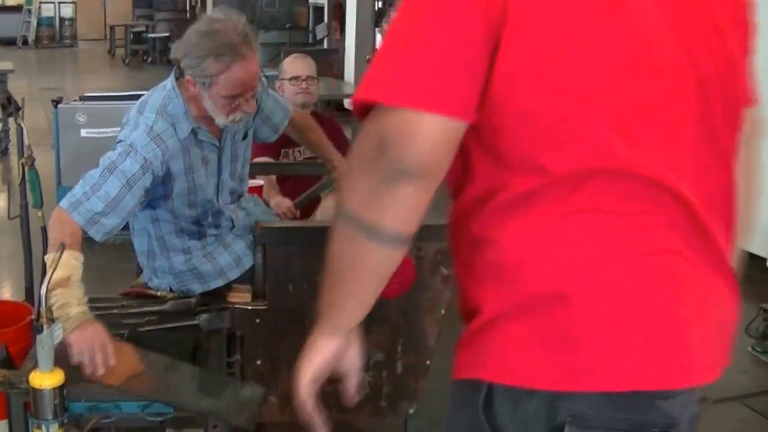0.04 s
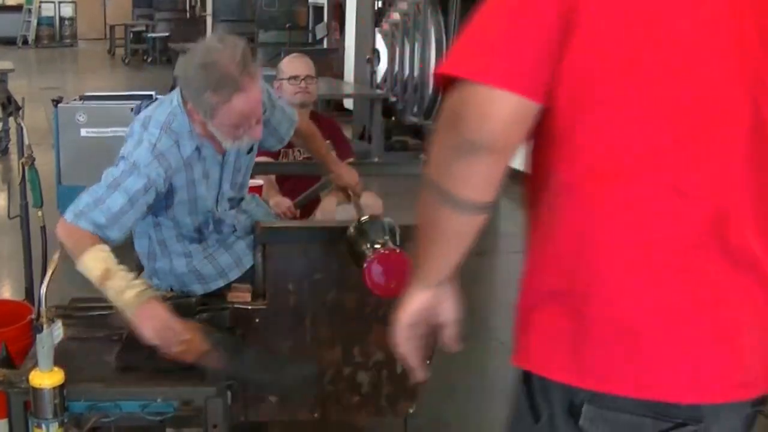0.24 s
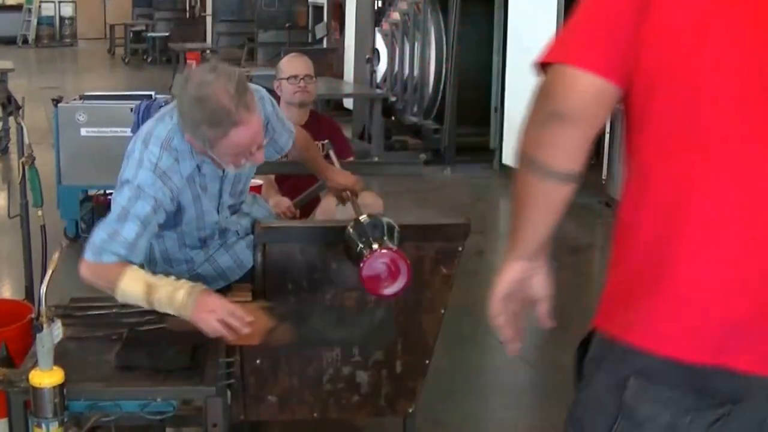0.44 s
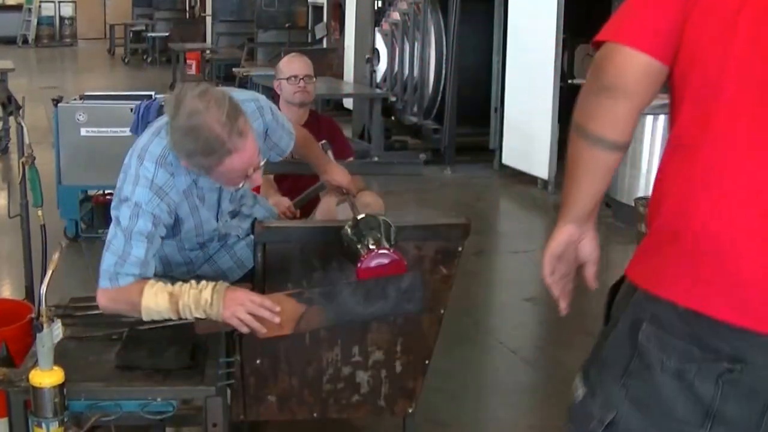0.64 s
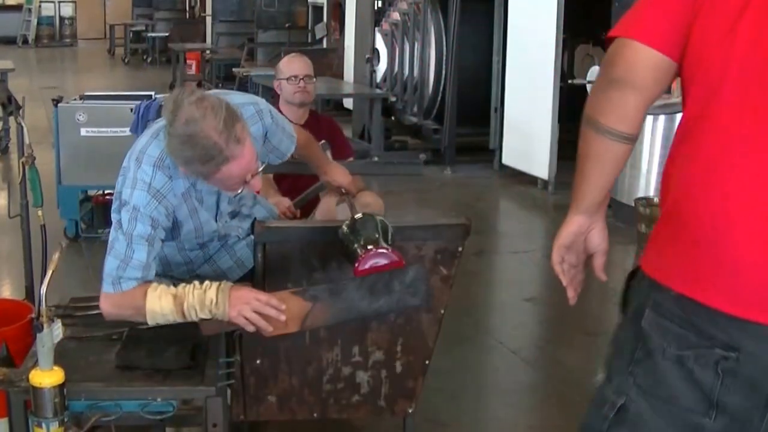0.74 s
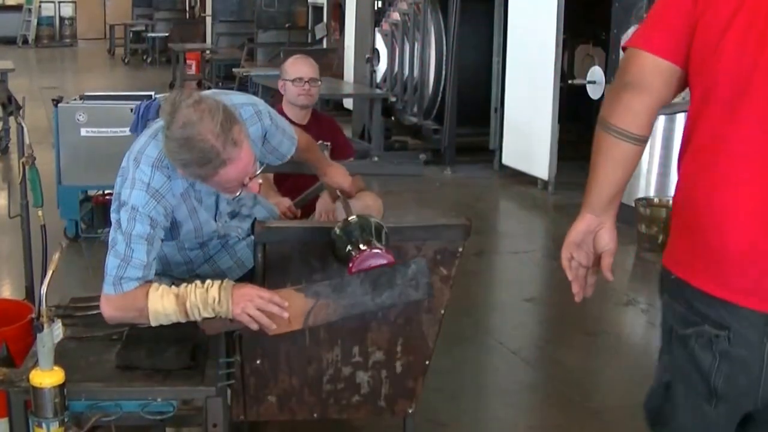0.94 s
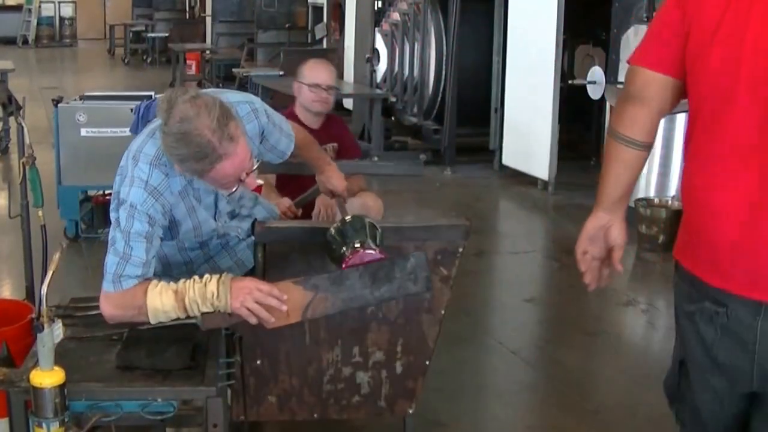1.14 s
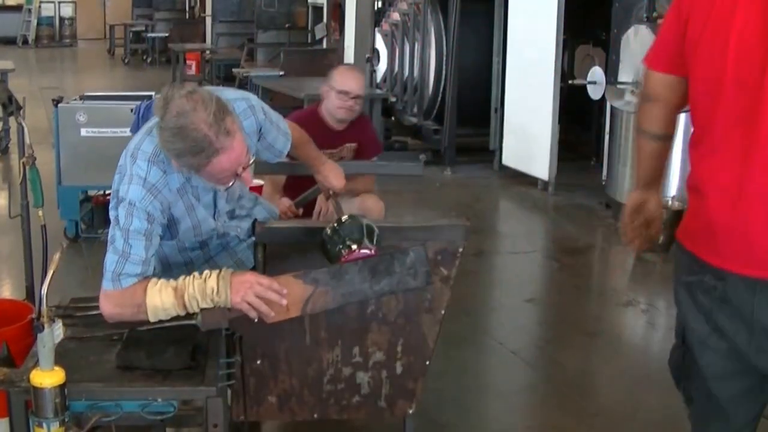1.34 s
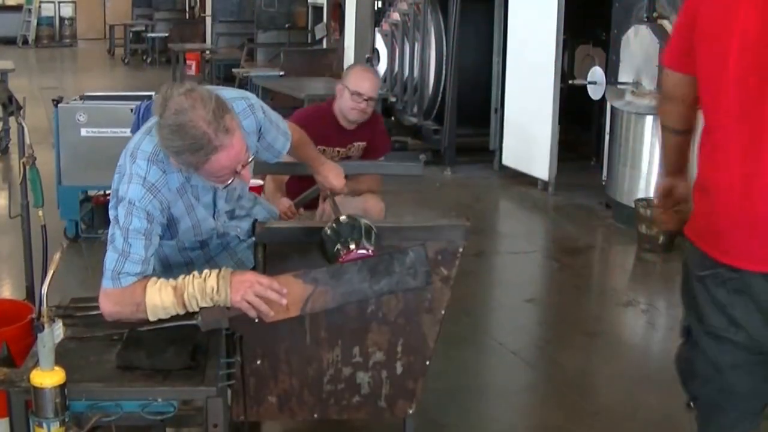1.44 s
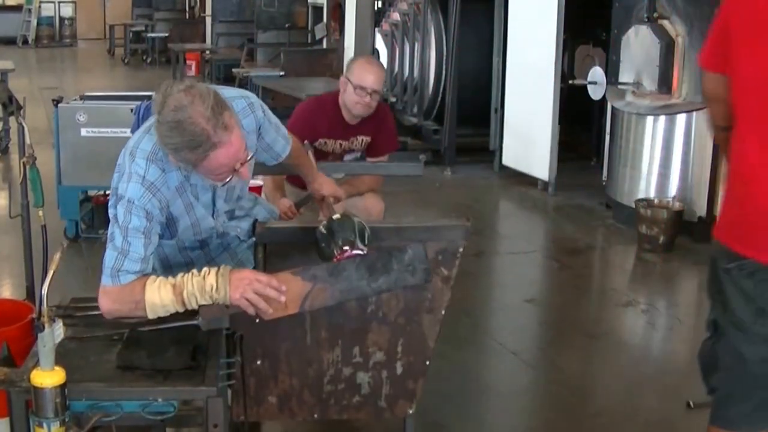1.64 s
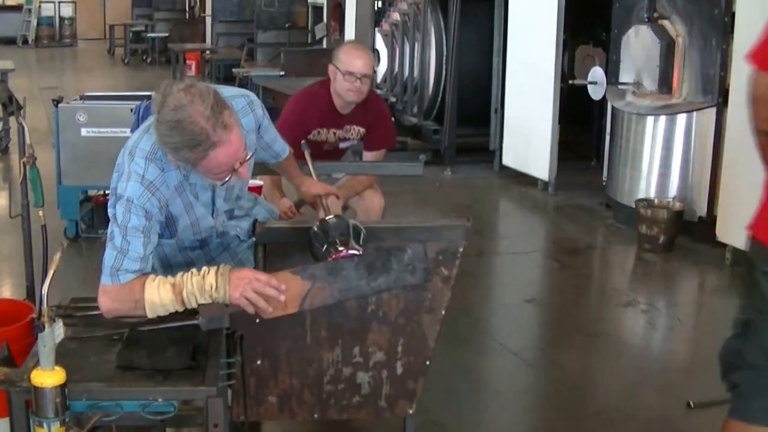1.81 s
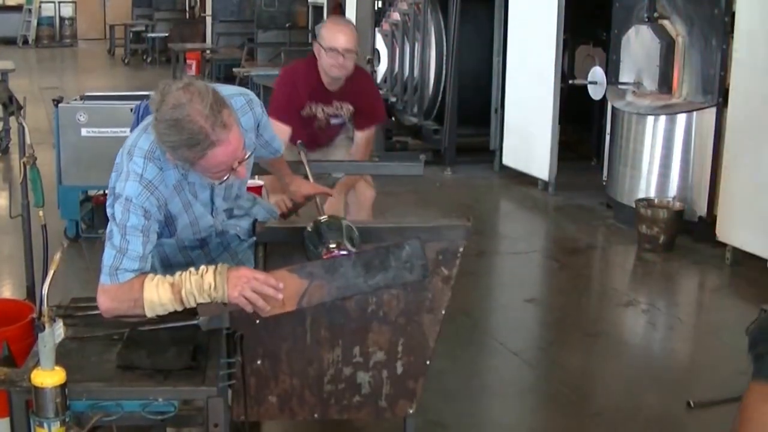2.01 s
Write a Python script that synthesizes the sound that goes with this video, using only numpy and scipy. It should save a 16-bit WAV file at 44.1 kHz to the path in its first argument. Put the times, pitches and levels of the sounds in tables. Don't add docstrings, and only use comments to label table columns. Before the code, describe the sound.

Gas furnace burners roar steadily in a hard-floored glass workshop, starting abruptly at about 0.05 s after a tiny silence. Broad hiss dominates over low flame rumble, a faint mid-low blower hum, thin whistling and brief wavering moans. A bright steel clink rings at the start, a dull knock and faint high clink come around 0.26-0.36 s, and the loudest, lower clank at 0.83 s. The roar continues to the end.

```python
import sys
import numpy as np
from scipy import signal
from scipy.fft import rfft, irfft, next_fast_len
from scipy.io import wavfile

SR = 44100
rng = np.random.default_rng(int(sys.argv[2]) if len(sys.argv) > 2 else 0)


def natural_amplitude(level_db):
    exponent = np.asarray(level_db, float) / 20
    return 10 ** exponent


def unload_audio(sound):
    columns = np.transpose(np.atleast_2d(sound))
    steps = np.round(np.clip(columns, -1, 1) * 32767)
    wavfile.write(sys.argv[1], SR, steps.astype(np.int16))


N = 91331

# start_s, rumble_swell_db, jet_swell_db
FLOW = [(0, 1, 1), (.3, 0, 0.5), (.6, 1, 0), (.9, 2, 0.5), (1.2, 1.5, 0.5), (1.5, 0.5, 0.5), (1.8, 1.5, 0),
        (2.07, 0, 0.5)]


def at_hz(points, hz, skirt_db=0.):
    table_oct = np.log2(np.array(points)[:, 0])
    values = np.array(points)[:, 1]
    pitch_oct = np.log2(hz)
    beyond_oct = np.maximum(table_oct[0] - pitch_oct, 0) + np.maximum(pitch_oct - table_oct[-1], 0)
    return np.interp(pitch_oct, table_oct, values) - skirt_db * beyond_oct


def in_time(rows):
    time_s, *columns = np.transpose(rows)
    return [np.interp(np.arange(N) / SR, time_s, c) for c in columns]


def rms_one(x):
    return x / np.sqrt(np.mean(x ** 2) + 1e-20)


def drift(rate_hz):
    hop = 40
    pole = np.exp(-2 * np.pi * hop * rate_hz / SR)
    noise = rng.standard_normal(N // hop + 2002)
    slow = signal.lfilter([1], [1, -2 * pole, pole * pole], noise)[2000:]
    return np.interp(np.arange(N) / hop, np.arange(len(slow)), rms_one(slow))


def diffuse(gain_of_hz, wide_db=0):
    # pitch_hz, side_minus_mid_db
    width = [(60, -15), (200, -27), (640, -18), (1800, -10), (4600, -9), (5900, -5.5), (8700, -8),
             (14000, 1)]
    # pitch_hz, left_minus_right_db
    lean = [(1500, 0), (2400, 0), (3700, 0), (5300, -4), (6500, 3.5), (7700, 1), (9500, -5), (11000, -.6)]
    size = next_fast_len(N)
    hz = np.maximum(np.arange(size // 2 + 1) * SR / size, 1)
    mid, side = rfft(rng.standard_normal((2, size))) * gain_of_hz(hz)
    side = side * natural_amplitude(at_hz(width, hz) + wide_db)
    left_gain = natural_amplitude(at_hz(lean, hz) / 2)
    out = irfft(np.array([(mid + side) * left_gain, (mid - side) / left_gain]), size)[:, :N]
    return out / np.sqrt(np.mean(out.mean(0) ** 2))


def turbulence(spectrum, patchy_db, rate_hz, count):
    centres_oct = np.linspace(*np.log2([spectrum[0][0], spectrum[-1][0]]), count)
    step_oct = centres_oct[1] - centres_oct[0]
    together = drift(rate_hz / 4)
    grid_hz = np.geomspace(10, SR / 2, 4000)
    out = 0
    for centre_oct in centres_oct:
        def colour(hz):
            pitch_oct = np.clip(np.log2(hz), centres_oct[0], centres_oct[-1])
            band = np.cos(np.pi / 2 * np.clip((pitch_oct - centre_oct) / step_oct, -1, 1))
            return natural_amplitude(at_hz(spectrum, hz, skirt_db=40)) * band + 1e-12
        weight = np.sqrt(np.sum(colour(grid_hz) ** 2 * grid_hz))
        flicker_db = patchy_db * (.6 * together + drift(rate_hz))
        out = out + weight * diffuse(colour) * natural_amplitude(flicker_db)
    return out / np.sqrt(np.mean(out.mean(0) ** 2))


def flames():
    # pitch_hz, density_db
    rumble = [(25, -49), (100, -31), (135, -9), (195, -9), (250, -3), (430, -3.5), (560, -15), (700, -16.5)]
    swell_db, _ = in_time(FLOW)
    return natural_amplitude(-37.5 + swell_db) * turbulence(rumble, patchy_db=0.6, rate_hz=13.0, count=8)


def burner_jets():
    # pitch_hz, density_db
    jet_spectrum = [(560, -20), (800, -6), (1270, -8), (1650, -3), (2900, -0.5), (4000, -3), (5250, -5),
                    (6000, -12.5)]
    _, swell_db = in_time(FLOW)
    return natural_amplitude(-29.5 + swell_db) * turbulence(jet_spectrum, patchy_db=0.09, rate_hz=13.6, count=8)


def nozzle_hiss():
    # pitch_hz, density_db
    lip_spectrum = [(5600, -6.5), (6700, -2), (8500, -14.5), (9700, -14.5), (10600, -22), (13000, -31),
                    (15200, -33), (16000, -40)]
    _, swell_db = in_time(FLOW)
    return natural_amplitude(-44.5 + swell_db) * turbulence(lip_spectrum, patchy_db=1.2, rate_hz=21.0, count=5)


def whistles():
    # pitch_hz, width_hz, level_db, right_minus_left_db, extra_width_db
    resonances = [(2990, 240, -46.5, -4, 7), (7790, 120, -63, 0, 0), (8950, 400, -67, 0, 0),
                  (810, 50, -59, 0, 0), (276, 30, -52, 0, 0)]
    out = 0
    for pitch_hz, width_hz, level_db, lean_db, wide_db in resonances:
        tone = diffuse(lambda hz: 1 / (1 + (2 * (hz - pitch_hz) / width_hz) ** 2), wide_db)
        pan = natural_amplitude([[-lean_db / 2], [lean_db / 2]])
        out = out + tone * natural_amplitude(level_db + 1.2 * drift(8.)) * pan
    return out


def blower():
    # start_s, pitch_hz, level_db
    blade = [(0, 437, -47), (.3, 437, -42), (.6, 437, -43), (.85, 437, -46), (1.18, 437, -50),
             (1.4, 437, -42), (1.75, 437, -44), (2.07, 436, -41)]
    pitch_hz, level_db = in_time(blade)
    level = np.sqrt(2) * natural_amplitude(level_db + 3.1 * drift(12.0))
    return level * np.sin(2 * np.pi * np.cumsum(pitch_hz + 0.57 * drift(6.4)) / SR)


def clinks():
    # start_s, level_db, t60_s, centre_hz, width_oct
    strikes = [
        (.043, -38.5, .9, 5800, .55),
        (.0432, -49, .9, 9000, .12),
        (.0447, -52, .015, 12000, .6),
        (.3595, -48, .45, 9500, .28),
        (.3597, -55, .12, 10500, .55),
        (.832, -30, .12, 1850, .35),
        (.262, -40, .35, 600, .12),
    ]
    attack_cycles, crack_db, crack_s = 6, 0, .004
    t = np.arange(N) / SR
    out = 0
    for start_s, level_db, t60_s, centre_hz, width_oct in strikes:
        age_s = np.maximum(t - start_s, 0)
        attack = np.minimum(age_s * centre_hz / attack_cycles, 1)
        decay = natural_amplitude(-60 * age_s / t60_s) + natural_amplitude(crack_db) * np.exp(-age_s / crack_s)
        ring = diffuse(lambda hz: np.exp(-(np.log2(hz / centre_hz) / width_oct) ** 2))
        out = out + natural_amplitude(level_db) * attack * decay * ring
    return out


def moans():
    # start_s, length_s, level_db, start_hz, end_hz
    locked = [(.05, .12, -43, 255, 255), (.33, .3, -44, 266, 279), (.72, .58, -44, 280, 275),
              (.64, .42, -42, 338, 354), (1.02, .25, -43, 395, 398), (1.57, .55, -46, 283, 283),
              (1.25, .15, -43, 318, 318), (.22, .2, -46, 457, 460)]
    waver_hz, waver_db, edge_s = 2.5, 3, .06
    t = np.arange(N) / SR
    out = 0
    for start_s, length_s, level_db, start_hz, end_hz in locked:
        end_s = start_s + length_s
        pitch_hz = np.interp(t, [start_s, end_s], [start_hz, end_hz]) + waver_hz * drift(17.3)
        shape = np.sin(np.pi / 2 * np.clip(np.minimum(t - start_s, end_s - t) / edge_s, 0, 1))
        level = np.sqrt(2) * shape * natural_amplitude(level_db + waver_db * drift(19.0))
        out = out + level * np.sin(2 * np.pi * np.cumsum(pitch_hz) / SR)
    return out


def scene():
    return flames() + burner_jets() + nozzle_hiss() + whistles() + blower() + clinks() + moans()


def low_pass(x):
    return signal.sosfilt(signal.butter(12, 16460, fs=SR, output="sos"), x)


def record(dry):
    start_s, low_cut_hz, top_hz = .0452, 20, 15770
    x = signal.sosfilt(signal.butter(2, low_cut_hz, "high", fs=SR, output="sos"), dry)
    x = x * (np.arange(N) / SR >= start_s)
    x = signal.sosfilt(signal.ellip(10, .5, 70, top_hz, fs=SR, output="sos"), x)
    return low_pass(x)


dry = scene()
out = record(dry)
unload_audio(out)
```